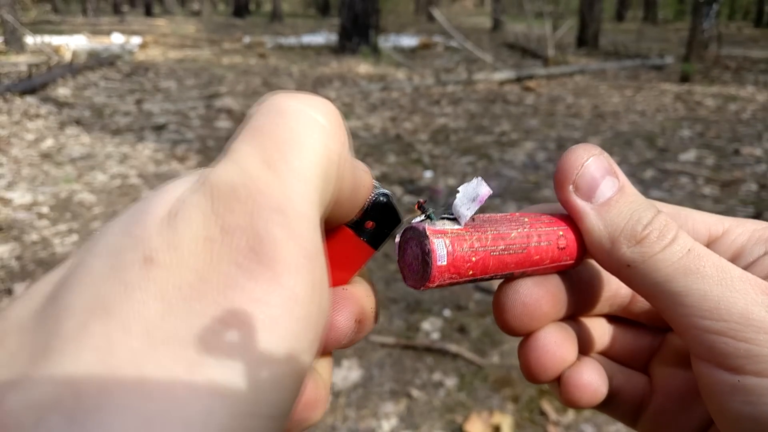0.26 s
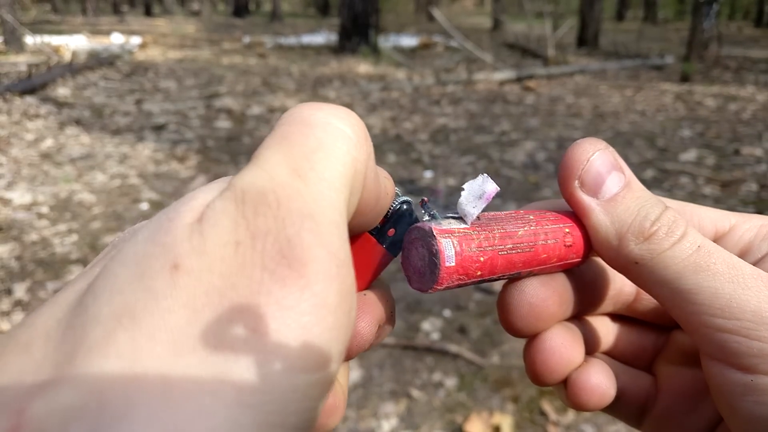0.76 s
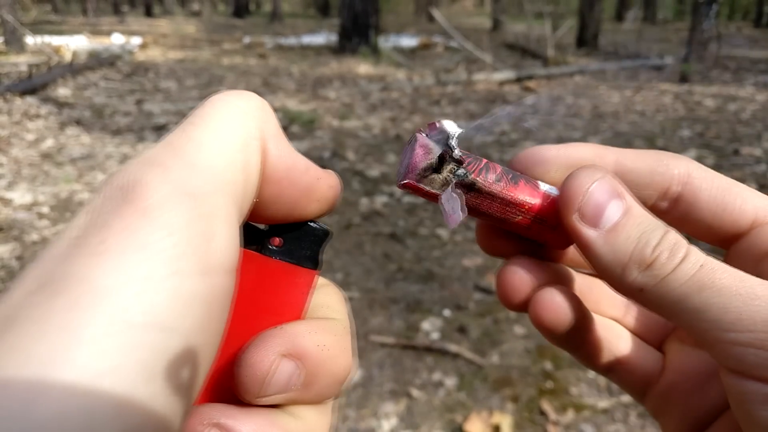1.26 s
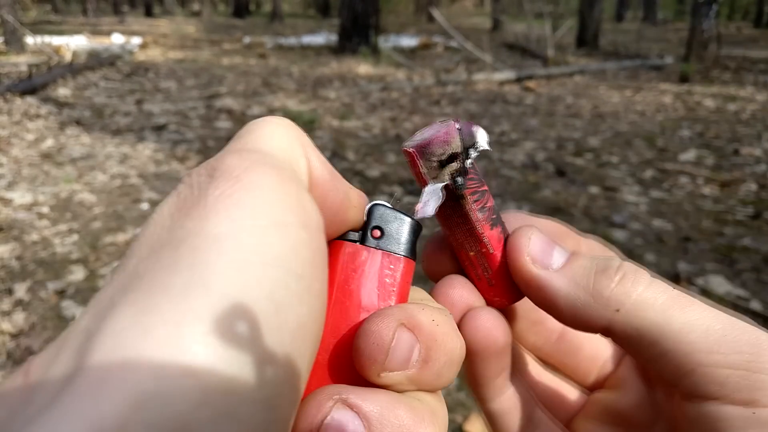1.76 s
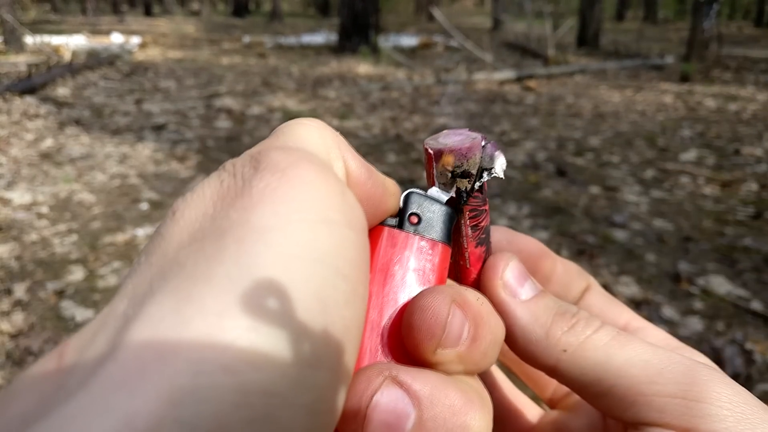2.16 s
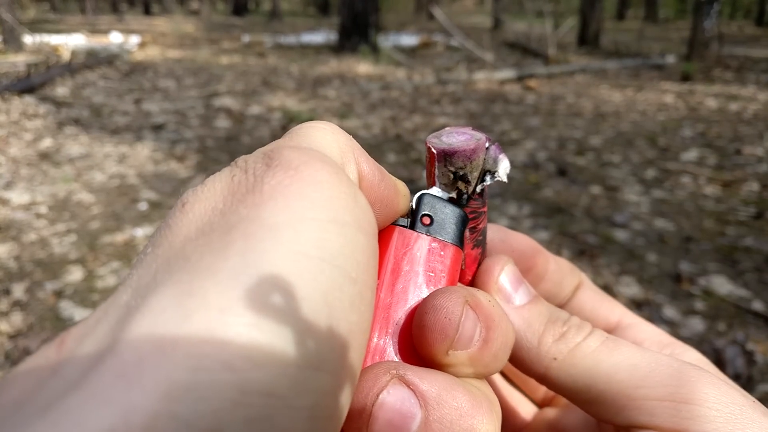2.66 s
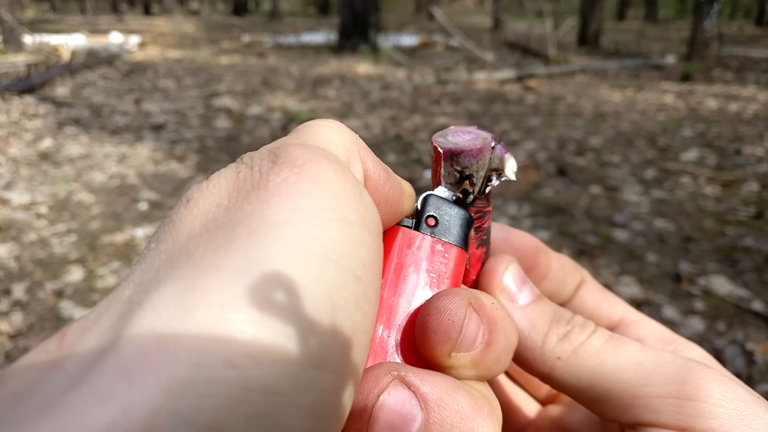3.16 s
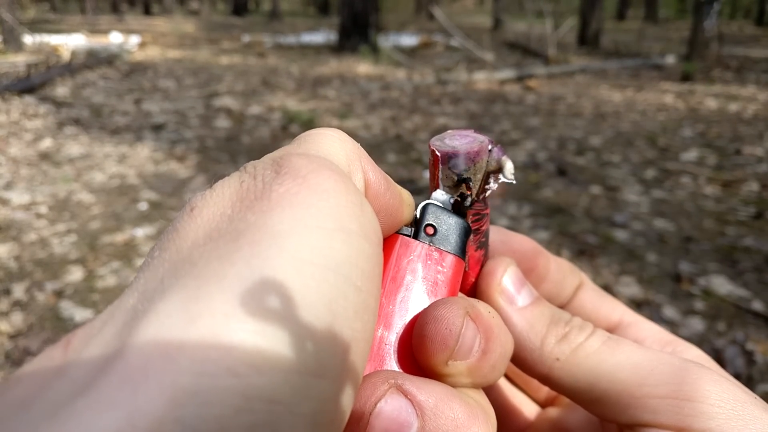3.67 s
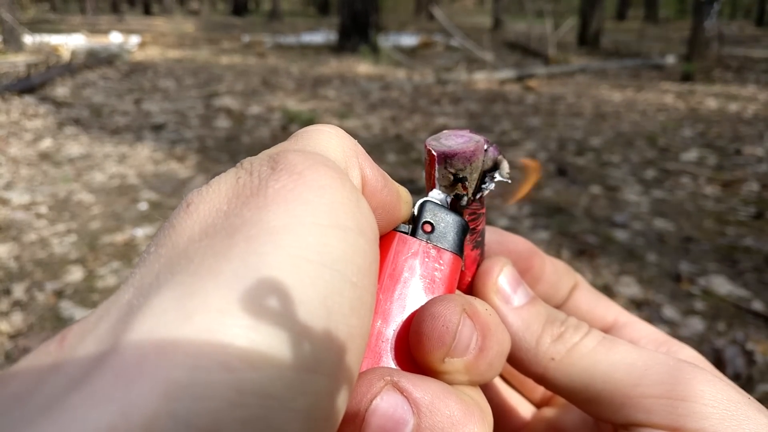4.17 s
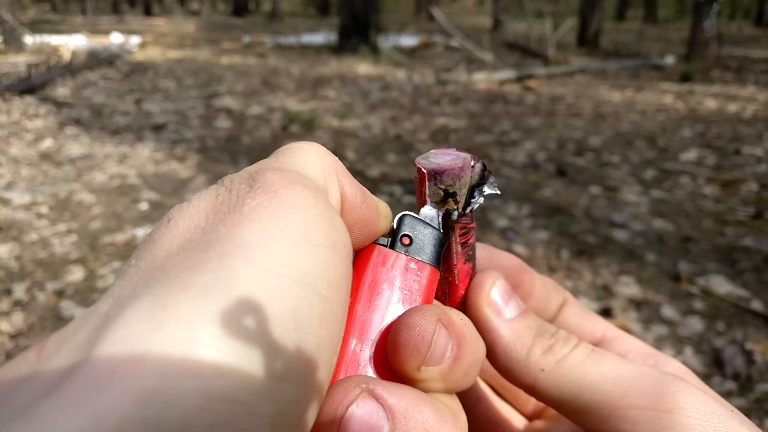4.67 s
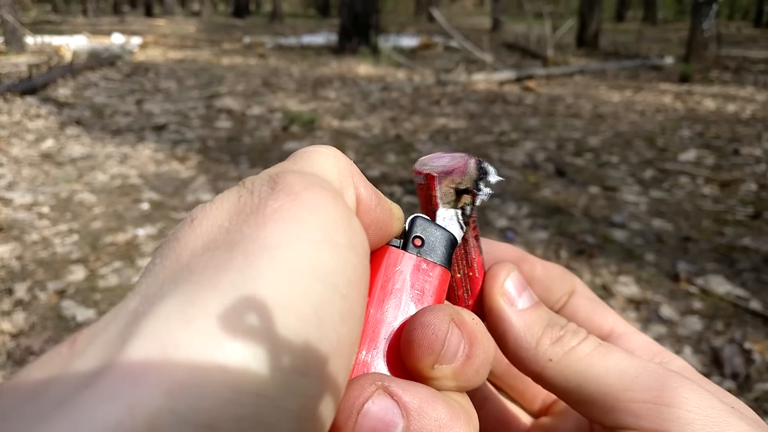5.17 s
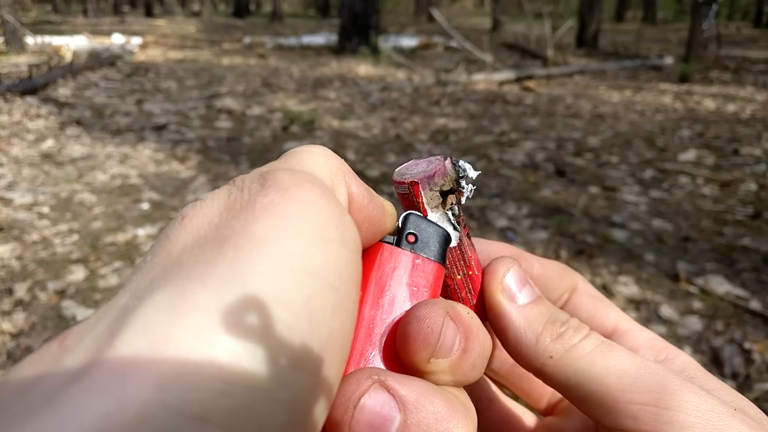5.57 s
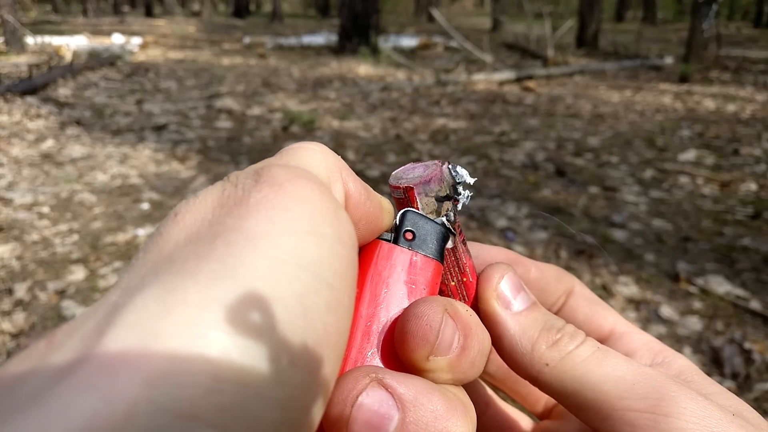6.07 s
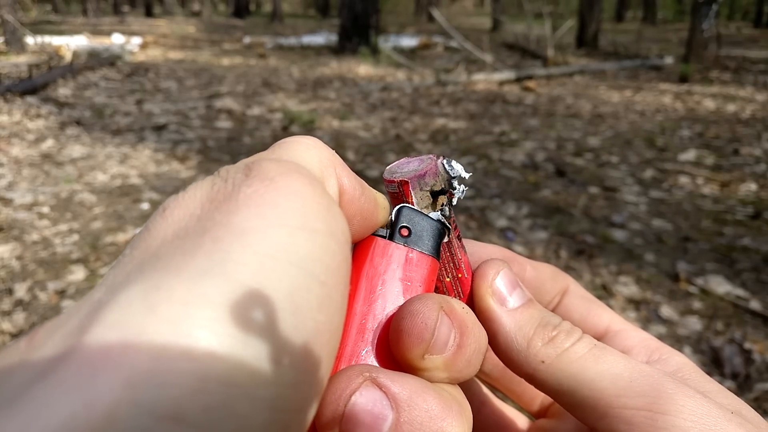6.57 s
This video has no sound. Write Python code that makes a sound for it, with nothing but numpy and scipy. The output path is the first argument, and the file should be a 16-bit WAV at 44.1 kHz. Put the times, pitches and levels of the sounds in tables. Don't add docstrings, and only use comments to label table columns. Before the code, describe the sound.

Tail of one flint scrape, fumbling clicks, then a loud gritty lighter strike, soft slips and sparse birdsong over rumbling wind outdoors.

```python
import sys
import numpy as np
from scipy import signal
from scipy.fft import rfft, irfft, next_fast_len
from scipy.io import wavfile
from scipy.ndimage import uniform_filter1d

SR = 44100
rng = np.random.default_rng(int(sys.argv[2]) if len(sys.argv) > 2 else 0)


def dump_mix(stems):
    frames = np.atleast_2d(stems).T
    limited = np.clip(frames, -1, 1)
    pcm = np.round(limited * 32767).astype(np.int16)
    wavfile.write(sys.argv[1], SR, pcm)


def boost(x):
    u = np.asarray(x, float) / 20
    return 10 ** u


N = 301321
STEP = 16

# (peak time [s], peak level [dB], rise [s], fall [s])
STRIKE_BURSTS = [(1.709, -38, 0.0039, 0.0026), (1.7185, -34, 0.003, 0.0064), (1.7245, -36, .001, 0.0041),
                 (1.7305, -34, 0.0014, 0.0026), (1.7355, -28, 0.0028, .002), (1.7405, -25, 0.0031, 0.003),
                 (1.7465, -20.5, .0015, 0.0048), (1.7535, -17, .002, .003), (1.7595, -9.5, 0.0028, 0.0045),
                 (1.767, -6.5, 0.003, .003), (1.773, -12, 0.002, .005), (1.782, -22, .004, 0.0072),
                 (1.797, -33, .006, .003), (1.805, -44, .004, .004), (1.83, -55.5, .03, .02)]
# (peak time [s], peak level [dB], rise [s], fall [s])
EARLIER_BURSTS = [
    (.001, -17, 0.0035, 0.00074),
    (.006, -20.5, 0.0018, 0.0054),
    (.013, -37, 0.0015, 0.0034),
    (.018, -35.5, 0.012, 0.0074),
    (.032, -44, 0.0019, 0.0051),
]
# (frequency [Hz], left level [dB], right level [dB])
WHEEL_COLOUR = [(300, -28, -28), (700, -24, -21), (1200, -20, -16), (1750, -13, -11), (2150, -12, -10),
                (2550, -11, -5), (3300, -10, -8), (4300, -4.5, -4), (5200, -9, -12), (6400, -2, -3),
                (7700, -17, -16), (9000, -25, -6), (10800, -28, -4.5), (12400, -16, -3.5), (13500, -13, 3),
                (15400, -7, -3.5)]
# (frequency [Hz], left level [dB], right level [dB])
WHEEL_AWAY_COLOUR = [(298, -17, -11), (1280, -27, -22.5), (2320, -11, -3.5), (3300, -21, -9),
                     (4030, -3, -3), (5200, -22.5, -20), (6500, -9.5, -23.5), (8300, -15.5, -9),
                     (10800, -26, -9), (13800, -16, 2), (15300, -24, -6.5)]
# (frequency [Hz], lag [samples])
BODY_DETOUR = [(1000, 8.5), (1800, 8.8), (2150, 10.25), (2500, 11.6), (3200, 11.), (4400, 10.), (5700, 9.2),
               (6200, 10.7), (6700, 12.2), (7600, 11.7), (15000, 11.)]
# (frequency [Hz], width [Hz], level [dB])
HOOD_MODES = [(5700, 700, -17), (11300, 900, -15), (13400, 900, -14)]
# (time [s], frequency [Hz], level [dB])
BODY_GLIDE = [
    (0, 2500, 6),
    (.05, 2500, 6),
    (1.72, 3050, 16),
    (1.745, 3000, 13),
    (1.755, 2550, 15),
    (1.766, 2500, 16),
    (1.772, 3300, 2),
    (1.8, 3400, 3),
]
# (peak time [s], peak level [dB], rise [s], fall [s])
SKIN_STROKES = [(0.48, -54, 0.33, 0.15), (0.905, -51.5, 0.37, 0.017), (1.166, -41.5, 0.019, 0.1),
                (1.29, -38, 0.0079, 0.0047), (1.38, -60, 0.0709, 0.0156), (1.82, -53, .15, 0.25),
                (2.071, -48, 0.0071, 0.017), (2.121, -39.5, 0.0041, 0.01), (2.69, -59, 0.01564, 0.99),
                (3.94, -53, 0.18, 0.00896), (4.76, -52, 0.1, 0.044), (4.84, -55, 0.03, .03),
                (5.15, -63, .08, 0.63), (5.55, -58, .015, 0.0078), (5.839, -56, .018, 0.14),
                (6.03, -64, .03, 0.4), (6.7, -68.5, 0.36, 0.26)]
# (start time [s], end time [s], level [dB])
TIGHT_GRIPS = [
    (0.324, 0.41, -72),
    (0.92, 1.14, -65),
    (2.13, 2.697, -66.5),
    (2.952, 3.652, -64),
    (3.663, 3.772, -55),
]
# (time [s], peak level [dB], body
# ring level [dB], body ring frequency [Hz])
FINGER_SLIPS = [(0.3272, -51.5, -8.5, 2720), (0.336, -68, -20, 5000), (0.372, -61, -8, 4200),
                (0.378, -61, -7, 3000), (0.4244, -56, -9, 5600), (0.4723, -50.5, -11, 4400),
                (0.4978, -52.5, -7, 2800), (0.668, -53, -17, 2500), (0.744, -54.5, -7, 4300),
                (0.8775, -44.5, -16.5, 5850), (0.9014, -65, 0.5, 3730), (0.909, -57, -4, 3780),
                (1.06, -54, -14, 3060), (1.1024, -60, -3.5, 4071), (1.114, -62, -24, 5000),
                (1.162, -51, -4, 2584), (1.1674, -46, -4.5, 6500), (1.171, -39, -13.5, 5910),
                (1.1826, -39, -10, 2680), (1.1944, -52, -20, 4270), (1.2064, -49, -15, 2500),
                (1.2332, -54.5, -9, 5700), (1.2487, -53, -15, 3480), (1.29, -37.5, -19, 5840),
                (1.2967, -51, -10.5, 3180), (1.347, -54, -6.5, 3180), (1.3665, -52.5, -2.5, 2946),
                (1.378, -49, -8, 3400),
                (1.506, -67, 0, 3200), (1.6153, -48, 5.5, 3750), (1.6393, -47, -10, 3400),
               (1.684, -53, 0, 5500), (1.695, -50.5, 3, 5750), (1.7033, -34.5, -17, 3930),
               (1.7105, -57, -16, 5500), (1.7178, -34, 0, 5700), (1.723, -56, 13, 2960),
               (1.8098, -32.5, -8.5, 5900), (1.8285, -57, -25.5, 5640), (2.0724, -50, -7.5, 5900),
               (2.1188, -47.5, -6, 5800), (2.3314, -56.5, -25, 4440), (2.6862, -55, -20, 5350),
               (2.9198, -49.5, -16, 2900), (3.1573, -54, -12, 3250), (3.897, -55.5, -13, 5260),
               (3.924, -56, -13, 2510), (3.9817, -45.5, -24, 2720), (3.9992, -58, -12, 2870),
               (4.0288, -58, 1, 2790), (4.7087, -56, -17, 5540), (4.7415, -50.5, -8.5, 2820),
               (4.7644, -64.5, 2, 3400), (5.5488, -54, -15, 5860), (5.851, -63.5, 0, 5500),
               (5.875, -58, -10.5, 5500), (5.9377, -54, -16, 3300), (6.6083, -56, -13.5, 3050)]
# (time [s], peak [dB], body ring [dB], body ring [Hz])
GRIP_CREAK = [
    (3.652, -61, -21, 2660),
    (3.6616, -55, -19, 3020),
    (3.676, -50, -14, 2570),
    (3.679, -50, -12, 3400),
    (3.703, -52, -26, 4520),
    (3.7242, -53, -8, 2420),
    (3.7457, -50, -19, 4250),
    (3.765, -52.5, -14, 4470),
    (3.773, -64, -10, 5200),
]
# (time [s], peak [dB], body ring [dB], body ring
# [Hz])
FAINT_PECKS = [(1.279, -66, 6, 3500), (1.937, -72, 5, 3000), (1.941, -70, 5, 4300), (1.958, -68, 5, 4300),
               (2.047, -69, 5, 4250), (2.106, -68, 5, 4100), (2.175, -74, 5, 4000), (2.209, -75, 5, 4000),
               (2.247, -75, 5, 4000), (2.321, -72, 5, 4000), (3.511, -60, -20, 5000),
               (1.217, -57, -20, 5000), (1.281, -60, -25, 5000)]
# (start time [s], attack [s], hold [s], level [dB], sag over the hold [dB], release [s])
HISSES = [
    (0.014, 0.009, 0.213, -58.5, -2, 0.016),
    (3.946, 0.049, 0.36, -70, 1, 0.33),
]
# (frequency [Hz], left level [dB], right level [dB])
GAS_COLOUR = [(1189, -7.5, -4), (1770, -7, -10), (2720, -14, -3), (3300, -0.5, -9), (3950, -9, -6),
              (4900, -16, -14), (5570, -26, -18), (6500, -28, -23), (8000, -36, -26), (9938, -45, -19),
              (12500, -39, -16), (15100, -15, -16.5)]
# (frequency [Hz], left level [dB], right level [dB])
FLAME_COLOUR = [(1250, -8, -9.5), (1900, -33, -33), (2760, -2, 3), (3400, -7, 4), (4300, -3.5, -5),
                (5800, -23, -4), (6500, -21, -35), (7560, -37, -22), (10240, -39, -8.5), (12400, -42, -5.5),
                (15200, -4, -3.5)]
# (time [s], snap level [dB], thud level [dB], thud frequency before a 0.8
# scaling [Hz])
CAMERA_NUDGES = [(0.082, -57, -72, 151), (0.099, -49, -52, 207), (0.1298, -49, -38, 153),
                 (0.162, -46.5, -48, 150), (0.182, -57, -37, 151), (0.2105, -50, -34.5, 180.9),
                 (0.26, -67, -37, 149), (0.2957, -60, -34.5, 230), (0.3552, -52, -53, 151),
                 (1.764, -64, -41, 240), (3.4516, -44, -29, 170), (4.308, -48, -36.5, 234)]
# (start time [s], length [s], top frequency [Hz], loudest level [dB], last drop [Hz])
ARCHED_WHISTLES = [
    (0.367, 0.179, 4615, -56, 340),
    (1.445, 0.197, 4565, -58, 30),
    (2.449, 0.175, 4570, -58, 320),
    (3.395, 0.197, 4555, -56, 300),
    (4.875, 0.203, 4560, -63, 260),
    (6.153, 0.21, 4540, -61, 320),
]
# (time [s], level [dB], frequency [Hz], length [s])
LEVEL_PIPES = [
    (1.287, -64, 3400, 0.07),
    (1.647, -56, 3300, 0.19),
    (1.987, -59, 3300, 0.1),
    (2.347, -59.5, 3286, 0.13),
    (2.719, -61, 3250, 0.14),
    (3.106, -64.5, 3220, 0.12),
]
# (frequency [Hz], width [Hz], level [dB])
THROAT_MODES = [(2130, 450, -4.5), (2950, 420, -2.5), (3670, 480, -2), (4230, 460, 1)]
# (time [s], rumble level [dB])
GUSTS = [(0.0, -38.5), (0.21, -43.5), (1.25, -43.5), (1.71, -41.5), (2.04, -43.5), (2.97, -44),
         (3.29, -44.5), (4.45, -43), (4.7, -42.5), (5.08, -44.5), (6.73, -43.5), (6.83, -42)]
# (frequency [Hz], density [dB per Hz])
RUMBLE_COLOUR = [(24, -33), (40, 7), (70, 1.5), (133, -7.5), (206, -16.5), (231, -21.5), (289, -41.5),
                 (335, -31.5), (500, -30), (650, -48.5), (1100, -120)]
# (frequency [Hz], density [dB per Hz])
HUSH_COLOUR = [(150, -20.5), (250, -6.5), (380, -21), (408, -25), (438, -26), (540, -17.5), (666, -10),
               (962, -8.5), (1130, -7.5), (1340, -11), (2800, -24.5), (5440, -27), (8270, -33.5),
               (15300, -29), (16400, -52)]
# (frequency [Hz], left-right correlation [-1 to 1])
LIKENESS = [(60, 0.86), (120, 0.93), (240, 0.88), (480, 0.47), (950, 0.01), (1890, 0.04), (3770, -0.04),
            (7520, 0.01), (15000, -0.05)]
# (frequency [Hz], left minus right level [dB])
BALANCE = [(60, -0.5), (150, 0.5), (380, 0.5), (950, 0.5), (2380, 0.0), (5980, 2.5), (15000, -5)]
# (frequency [Hz], threshold [dB])
DETAIL_FLOOR = [(500, -50), (1200, -26), (2000, -15), (3000, -12), (5500, -8.5), (7800, 2.5), (10000, -8),
                (15000, -7)]


def evened(x):
    return x / np.sqrt(np.mean(x ** 2) + 1e-20)


def read(points, hz, column=1):
    table = np.transpose(points)
    return np.interp(np.log(hz + 1), np.log(table[0] + 1), table[column])


def along(rows, column):
    table = np.array(rows)
    return np.interp(np.arange(N) / SR, table[:, 0], table[:, column])


def add(mix, s, sound):
    part = mix[..., round(s * SR):][..., :sound.shape[-1]]
    part += sound[..., :part.shape[-1]]


def causal(db_of_hz):
    log_gain = np.log(boost(np.maximum(db_of_hz(abs(np.fft.fftfreq(2048, 1 / SR))), -100)))
    return np.fft.ifft(np.exp(np.conj(signal.hilbert(log_gain)))).real[:512]


def band(x, lo_hz, hi_hz):
    sos = signal.butter(2, [lo_hz, min(hi_hz, SR * .49)], "band", fs=SR, output="sos")
    return signal.sosfilt(sos, x)


def delayed(x, samples, gain=1):
    size = next_fast_len(len(x))
    turn = np.exp(-2j * np.pi * np.fft.rfftfreq(size) * samples)
    return irfft(rfft(x, size) * gain * turn, size)[:len(x)]


def grit(per_s, spread_db):
    size = boost(spread_db * np.minimum(rng.exponential(1, N), 4)) * rng.choice([-1., 1.], N)
    return evened(size * (rng.random(N) < per_s / SR))


def hump(start, end, db, rise, fall, sag_db=0):
    t = np.arange(0, N, STEP) / SR
    held = db + sag_db * np.clip((t - start) / max(end - start, 1e-3), 0, 1)
    return held - 30 * (np.maximum(start - t, 0) / rise + np.maximum(t - end, 0) / fall)


def waver(size):
    return evened(uniform_filter1d(uniform_filter1d(rng.standard_normal(size), size=500), size=500))


def near(x, colour, lag, scatter):
    smear = rng.standard_normal(200) * np.exp(-np.arange(200) / 80.0)
    smeared = signal.oaconvolve(x, smear / np.linalg.norm(smear))[:N]
    left = x + scatter * band(smeared, 2900, 17000)
    hz = np.fft.rfftfreq(next_fast_len(N), 1 / SR)
    shading_db = read(colour, hz) - read(colour, hz, column=2)
    left = delayed(left, lag, boost(shading_db))
    port = causal(lambda hz: read(colour, hz, column=2))
    return signal.oaconvolve(np.array([left, x]), port[None] / np.linalg.norm(port), axes=1)[:, :N]


def strike(rows, colour, lag, scatter):
    t = np.arange(N) / SR
    push = sum(boost(db) * np.exp(-((t - s) / np.where(t < s, rise, fall)) ** 2) for s, db, rise, fall in rows)
    chips = push * (grit(3000, 3.) + .6 * rng.standard_normal(N))
    u = np.arange(600) / SR
    hood = sum(boost(db) * evened(np.exp(-np.pi * width * u) * np.sin(2 * np.pi * hz * u))
               for hz, width, db in HOOD_MODES)
    ringing = signal.oaconvolve(chips, hood / np.sqrt(len(u)))[:N]
    return near(chips + hollow(chips) + ringing, colour, lag, scatter)


def hollow(x):
    width_hz = 250.
    turn = np.exp(2j * np.pi * np.cumsum(along(BODY_GLIDE, column=1)) / SR)
    r = np.exp(-np.pi * width_hz / SR)
    smooth = signal.lfilter([1 - r], [1, -r], x / turn + 1e-18)
    return boost(along(BODY_GLIDE, column=2)) * (turn * smooth).real


def fingers():
    edge_s = .012
    strokes = [hump(s, s, db, rise, fall) for s, db, rise, fall in SKIN_STROKES]
    grips = [hump(*row, edge_s, edge_s) for row in TIGHT_GRIPS]
    drag_db = np.max(strokes + grips, axis=0).repeat(STEP)[:N]
    clumps = boost(4.2 * evened(uniform_filter1d(rng.standard_normal(N), size=500)))
    slips = evened(clumps * (.28 * grit(1500, 2.5) + rng.standard_normal(N))) * boost(drag_db)
    skin = band(slips, 9000, 17000) + boost(-5) * band(slips, 2500, 6500)
    return boost(np.array([[-6.], [4.]])) * np.array([delayed(skin, 7.5), skin])


def ticks():
    out, u = np.zeros((2, N)), np.arange(1200) / SR
    rows = FINGER_SLIPS + GRIP_CREAK + FAINT_PECKS
    peak_s = .0006
    shape = u / peak_s * np.exp(1 - u / peak_s)
    spike = 9. * signal.unit_impulse(len(u), round(peak_s * SR))
    noise = rng.standard_normal((len(rows), 2, len(u)))
    for (s, db, body_db, hz), (a, b) in zip(rows, noise):
        pan_db = -10 + 5 * b[-1]
        a = a + spike
        scratch = shape * np.array([0.38 * a + 0.47 * b, a])
        body = 1.9 * band(scratch, 0.91 * hz, 1.1 * hz) + 0.59 * band(scratch, 1900, 9000)
        bright = band(band(scratch, 7600, 16000), 5000, 20000)
        tick = boost(np.array([[.5], [-.5]]) * pan_db) * bright + boost(body_db + 13.5) * body
        tick[0] = delayed(tick[0], 9.7)
        add(out, s + 0.00014, boost(db + 3.0) * tick)
    return out


def flare():
    gas_db, flame_db = (hump(s + attack, s + attack + hold, db, attack, release, sag_db).repeat(STEP)[:N]
                        for s, attack, hold, db, sag_db, release in HISSES)
    flutter = boost(2.0 * evened(uniform_filter1d(rng.standard_normal(N), size=600)))
    hiss = flutter * (rng.standard_normal(N) + 0.49 * grit(410, 3.1))
    gas = near(hiss * boost(gas_db + 10), GAS_COLOUR, lag=8.0, scatter=.3)
    return gas + near(hiss * boost(flame_db + 17), FLAME_COLOUR, lag=5.1, scatter=.12)


def nudges():
    out, u = np.zeros(N), np.arange(2500) / SR
    for s, snap_db, thud_db, hz in CAMERA_NUDGES:
        thud = boost(thud_db + 8.5) * np.sin(2 * np.pi * 0.8 * hz * u) * np.exp(-u / 0.0017)
        snap = boost(snap_db + 15) * np.sin(2 * np.pi * 1900 * u) * np.exp(-u / .0002)
        add(out, s + 0.0024, -thud - snap)
    return out


def birds():
    high, low = np.zeros(N), np.zeros(N)
    for s, *call in ARCHED_WHISTLES:
        add(high, s, whistle(*call))
    pipes(low)
    chips(low)
    fading_db = 2.2 * np.clip(np.array([waver(N), waver(N)]), -2.5, 1) - 1
    high, low = boost(fading_db) * np.array([high, low])
    add(high, 4.938, rattle())
    return high, low


def whistle(length, top_hz, db, drop_hz):
    t = np.arange(0, length, 1 / SR)
    u = t / length
    crest, rise_hz, fall_hz = .36, 240, 250
    rise = rise_hz * np.maximum(1 - u / crest, 0) ** 2
    fall = fall_hz * (np.maximum(u - crest, 0) / (1 - crest)) ** 2.
    hz = top_hz - rise - fall - drop_hz * u ** 16
    level_db = db + np.interp(u, [0, .8, 1], [-13, 0, -4])
    flutter = 1 + .5 * u * np.sin(2 * np.pi * 45 * t)
    tone = np.sin(2 * np.pi * np.cumsum(hz) / SR) * signal.windows.tukey(len(t), .1)
    return np.sqrt(2) * boost(level_db) * flutter * tone


def pipes(mix):
    wobble_hz = 25. * waver(N)
    for s, db, hz, length in LEVEL_PIPES:
        u = np.arange(0, length, 1 / SR)
        turns = np.cumsum(hz - 300 * u + wobble_hz[round(s * SR):][:len(u)]) / SR
        swell = np.sin(np.pi * (u / length) ** 0.68) ** 1.5
        add(mix, s, boost(db - 1.5) * np.sin(2 * np.pi * turns) * swell)


def chips(mix):
    u = np.arange(0, .036, 1 / SR)
    swell = np.sin(np.pi * (u / u[-1]) ** 2.2) ** 2
    chip = np.sin(2 * np.pi * (5000 - 11000 * u - 260000 * u ** 2) * u) * swell
    for k, s in enumerate([2.315, *(2.471 + .1037 * np.arange(8))]):
        add(mix, s - .018, boost(-64 + .4 * k - 2) * chip)


def rattle():
    length_s, rate_hz, speedup = .72, 31, 5.
    t = np.arange(0, length_s, 1 / SR)
    turns = rate_hz * t + speedup * t ** 2 / 2
    puffs = (.9 + np.exp(-((turns % 1 - .3) / .22) ** 2)) * rng.standard_normal(len(t))
    voice = sum(boost(db) * band(puffs, hz - width / 2, hz + width / 2) for hz, width, db in THROAT_MODES)
    return boost(-62 - 10 * t / length_s) * evened(voice)


def trunks(x, pan_db, lag, wet_db, t60):
    u = np.arange(SR) / SR
    sparse = rng.standard_normal((2, SR)) * (rng.random((2, SR)) < .01)
    taps = sparse * boost(-60 * u / t60) * (u > .012)
    wet = signal.fftconvolve(x[None], taps / np.linalg.norm(taps[0]), axes=1)[:, :N]
    direct = boost(np.array([[.5], [-.5]]) * pan_db) * np.array([delayed(x, lag), x])
    return direct + boost(wet_db) * wet


def wind():
    rumble = field(RUMBLE_COLOUR, size=4096, patchy_db=1.5)
    hush = field(HUSH_COLOUR, size=1024, patchy_db=.4)
    rumble /= band(rumble, 35, 130).std()
    hush /= band(hush, 500, 1600).std()
    gust_db = along(GUSTS, column=1)
    hush_db = -56 + .13 * (gust_db + 40.5) - .16 * np.arange(N) / SR
    return boost(gust_db) * rumble + boost(hush_db) * hush


def field(colour, size, patchy_db):
    hop = size // 4
    hz = np.fft.rfftfreq(size, 1 / SR)
    a, b, c, d, patches = rng.standard_normal((N // hop + 5, len(hz), 5)).T
    patches = evened(uniform_filter1d(uniform_filter1d(patches, size=10, axis=0), size=10, axis=1))
    same = np.clip(read(LIKENESS, hz), -1, 1)[:, None]
    left = a + 1j * b
    z = np.array([left, same * left + np.sqrt(1 - same ** 2) * (c + 1j * d)])
    lean_db = np.multiply.outer([.5, -.5], read(BALANCE, hz))[..., None]
    z *= boost(read(colour, hz)[:, None] + patchy_db * patches + lean_db)
    return signal.istft(z, nperseg=size, noverlap=size - hop)[1][:, :N]


def scene():
    detour = read(BODY_DETOUR, np.fft.rfftfreq(next_fast_len(N), 1 / SR))
    wheel = strike(STRIKE_BURSTS, WHEEL_COLOUR, detour, scatter=.25)
    wheel = wheel + strike(EARLIER_BURSTS, WHEEL_AWAY_COLOUR, 7.76, scatter=0.34)
    high, low = birds()
    wood = trunks(high, 4., .4, wet_db=-7.5, t60=2.2) + trunks(low, -1., .3, wet_db=-6, t60=.6) + wind()
    return wheel + fingers() + ticks() + flare() + nudges() + wood


def lose_faint_detail(x):
    size, start = 1024, 1024 - 809
    n, k = np.arange(2 * size), np.arange(size)
    window = np.sin(np.pi * (n + .5) / (2 * size))
    basis = np.cos(np.pi / size * np.outer(n + (1 + size) / 2, k + .5)) * window[:, None]
    count = N // size + 3
    pair = np.pad(np.array([x[0] + x[1], x[0] - x[1]]) / 2, ((0, 0), (start + size, count * size - N)))
    halves = pair[:, :count * size].reshape(2, count, size)
    frames = np.concatenate([halves[:, :-1], halves[:, 1:]], axis=2)
    terms = frames @ basis
    bursts = (np.diff(frames, 2)[..., :2040] ** 2).sum(0).reshape(count - 1, 8, -1).sum(2)
    steady = bursts.max(1) < 4 * np.median(bursts, axis=1)
    around = uniform_filter1d((terms ** 2).max(0), size=40, axis=1)
    hunger = uniform_filter1d(uniform_filter1d(rng.standard_normal(terms.shape), size=14, axis=2), size=3, axis=1)
    around = around * boost(2 * 8.5 * evened(hunger))
    floor = boost(2 * read(DETAIL_FLOOR, k * SR / (2 * size)))
    weak = terms ** 2 < around * floor * steady[:, None]
    bands = uniform_filter1d((terms ** 2).reshape(2, count - 1, -1, 16).sum(3), size=2, axis=1)
    drowned = bands < bands[::-1] * boost(2 * -6.5)
    weak |= np.repeat(drowned, 16, axis=2) & (k > 80) & steady[:, None]
    lost = (terms * weak) @ basis.T * 2 / size
    gone = np.zeros_like(halves)
    gone[:, :-1] += lost[..., :size]
    gone[:, 1:] += lost[..., size:]
    mid, side = (halves - gone).reshape(2, -1)[:, start + size:][:, :N]
    return np.array([mid + side, mid - side])


def band_limit(x):
    return signal.sosfilt(signal.butter(12, 16520, fs=SR, output="sos"), x)


def record(dry):
    hz = np.fft.rfftfreq(next_fast_len(N), 1 / SR)
    colour = boost(np.interp(hz, [25, 50, 15900, 16020], [-40.0, 0.0, 0.5, -52.5]))
    shaped = np.array([delayed(port, 0, colour) for port in np.clip(dry, -1, 1)])
    mix = np.clip(lose_faint_detail(shaped), -1, 1)
    return band_limit(mix)


dry = scene()
out = record(dry)
dump_mix(out)
```